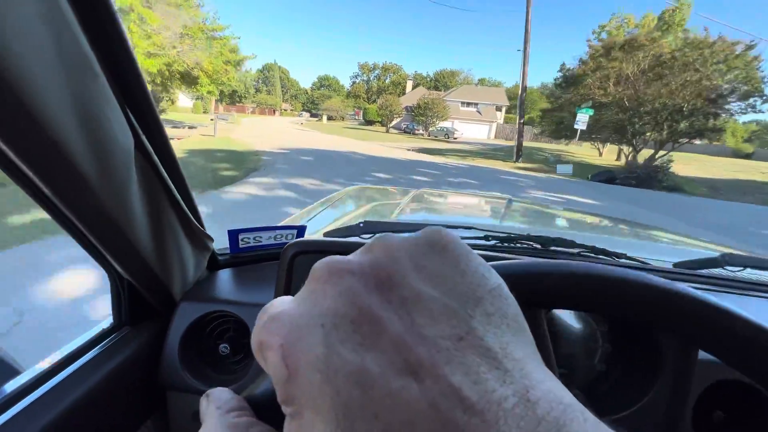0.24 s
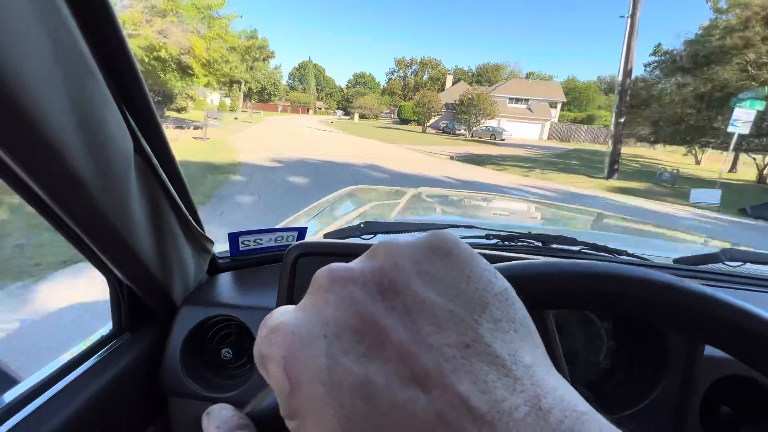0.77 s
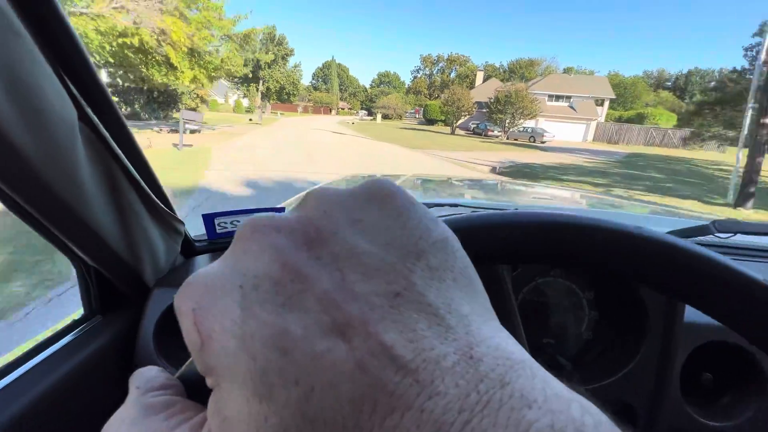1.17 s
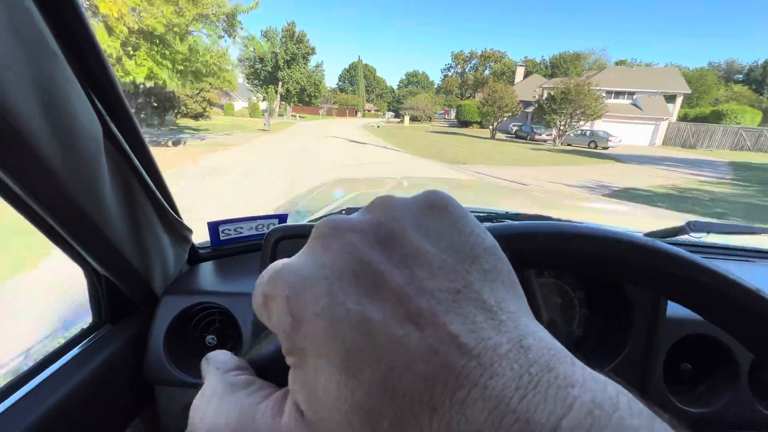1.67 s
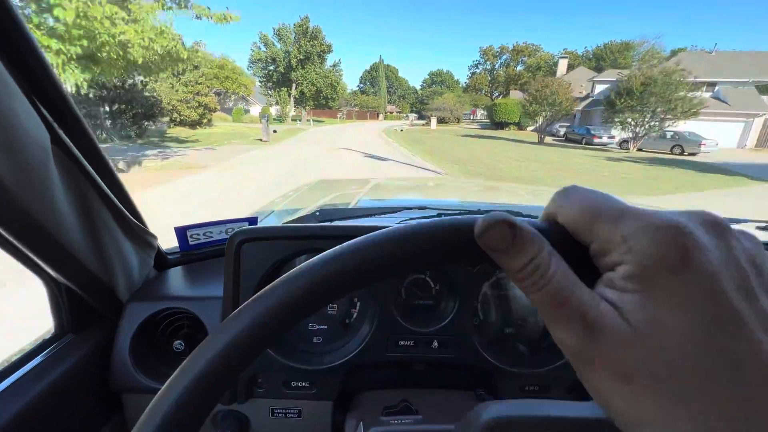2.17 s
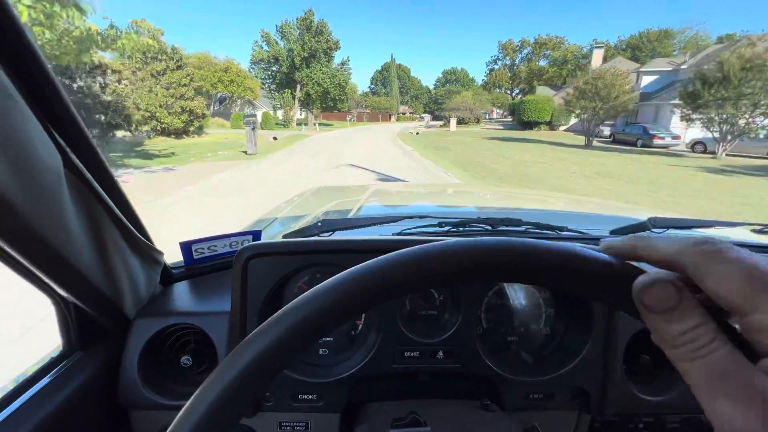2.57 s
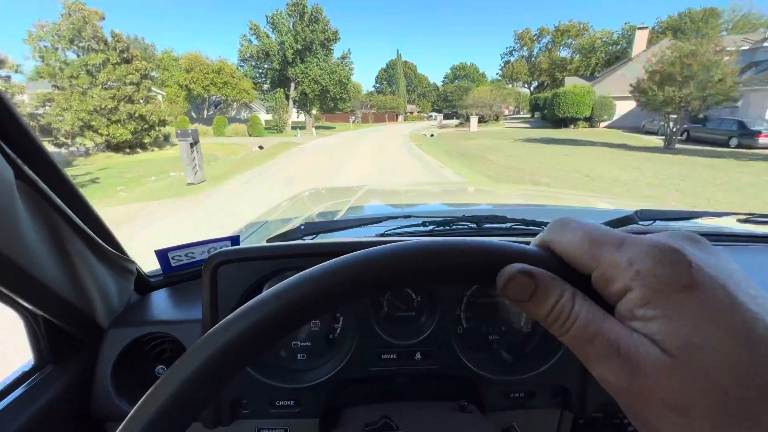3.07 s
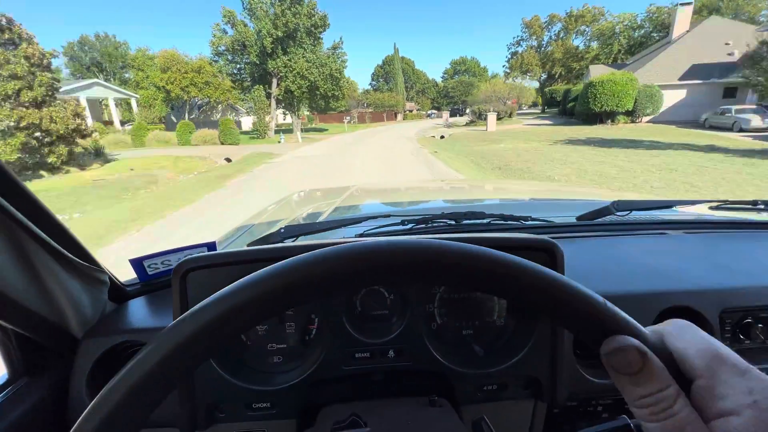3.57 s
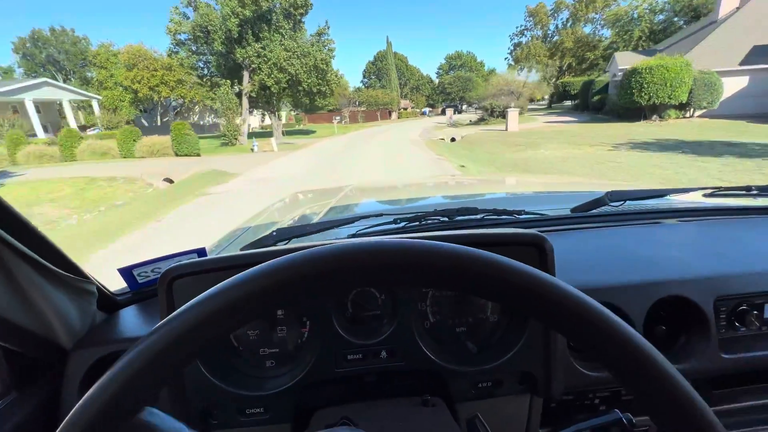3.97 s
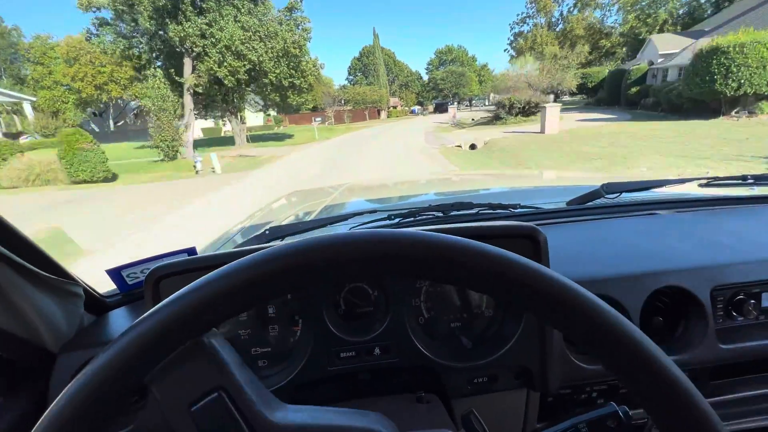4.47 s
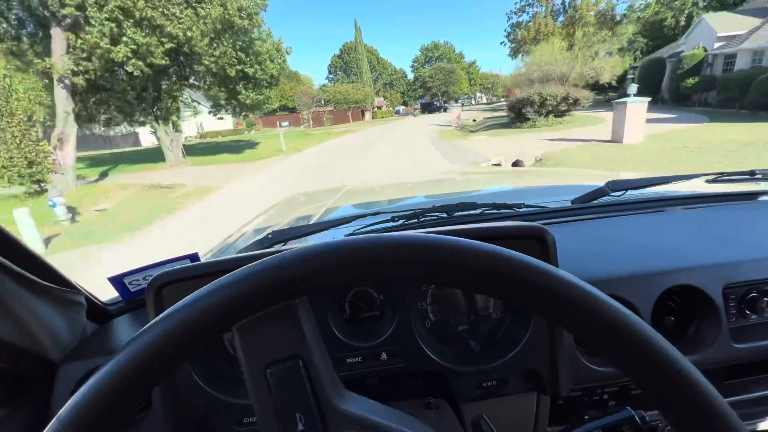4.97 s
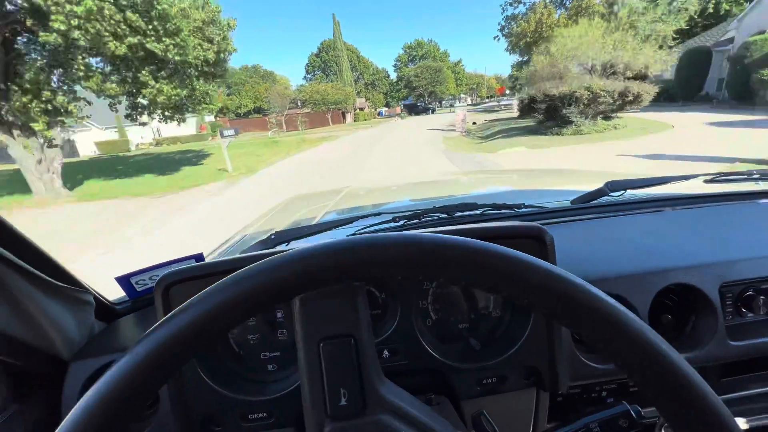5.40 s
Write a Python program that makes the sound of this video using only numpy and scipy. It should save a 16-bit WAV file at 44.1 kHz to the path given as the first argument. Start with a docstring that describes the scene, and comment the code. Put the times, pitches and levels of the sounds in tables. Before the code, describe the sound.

Heard at the driver's head with the left window open: a deep engine drone climbs, sags through a gear change, then climbs again and eases. Low body boom swells over bumps, tyre and air noise builds softly, and a thin gear whine glides. Sharp gritty cracks repeat about every third of a second, strongest midway. Faint hand brushes touch the wheel.

```python
"""Pulling away in an old four-wheel-drive

Heard at the driver's head with the left window open. The engine drones as firing-order sines, sags
through a gear change and climbs again; bumps swell a body boom of filtered noise; gears whine as gliding
sines; tyres and air are banded noise, louder left in the treble; something in a tyre tread cracks once a
wheel turn (noise bursts and taps); hands slide on the wheel in hissy brushes; an early ringing hiss fades.
"""
import sys
import numpy as np
from scipy import signal
from scipy.fft import rfft, irfft, next_fast_len
from scipy.io import wavfile
from scipy.ndimage import uniform_filter1d

SR = 44100
rng = np.random.default_rng(int(sys.argv[2]) if len(sys.argv) > 2 else 0)


def bounce(signal):
    """Save signal as a 16-bit WAV file at the path given by the first command-line argument."""
    frames = np.transpose(np.atleast_2d(signal))
    limited = np.clip(frames, -1, 1)
    pcm = np.round(limited * 32767).astype(np.int16)
    wavfile.write(sys.argv[1], SR, pcm)


N = 248724
TIME = np.arange(N) / SR
SIZE = next_fast_len(N)
FREQ = np.maximum(np.arange(SIZE // 2 + 1) * SR / SIZE, 1.)


def undb(db):
    """Decibels to gain."""
    return 10 ** (np.asarray(db) / 20)


def unit(x):
    """Scale to rms 1."""
    return x / np.sqrt(np.mean(x ** 2))


def curves(table):
    """Columns of a time table, one value a sample."""
    s, *columns = np.transpose(table)
    return [np.interp(TIME, s, c) for c in columns]


def over_freq(points):
    """(Hz, value) points joined on a log-frequency axis."""
    hz, value = np.transpose(points)
    return np.interp(np.log(FREQ), np.log(hz), value)


def resonances(modes):
    """Gain of steep resonances (each applied twice), summed in power."""
    power = 0
    for hz, width, db in modes:
        detune = (FREQ - hz ** 2 / FREQ) / width
        power = power + undb(2 * db) / (1 + detune ** 2) ** 2
    return np.sqrt(power)


def walk(rate):
    """Random levels held 1 / rate s and slewed twice; spread near 1."""
    k = int(SR / rate)
    steps = np.repeat(rng.standard_normal(N // k + 1), k)
    return 1.501 * uniform_filter1d(uniform_filter1d(steps, k), k)[:N]


def swells(table):
    """Power of bell-shaped swells from (time [s], length [s], level [dB]) rows."""
    return sum(undb(2 * db) * np.exp(-2 * (2 * (TIME - s) / length) ** 2) for s, length, db in table)


# how much louder the left is: (frequency [Hz], left over right [dB])
LEFT_LOUDER = [(100, .4), (250, 1.6), (600, 0.0), (1300, 4.0), (1800, 7.0), (2800, 8.0), (4400, 13.0),
               (7500, 13.0), (9500, .3), (15000, 0.0)]
# cabin noise shared by both microphones: (frequency [Hz], shared power [0-1])
LIKENESS = [(40, .999), (100, .985), (200, .95), (300, .45), (450, .15), (800, .25), (1200, .55),
            (2000, .35), (8000, .3), (15000, .4)]
EAR_LAG_S = 0.00043  # the head shadows one microphone: shared sound reaches the left later


def ears(likeness):
    """Spectra of noise at both microphones: a shared part, lagging left, and a part of their own."""
    shared, left, right = rfft(rng.standard_normal((3, SIZE)))
    share = np.clip(likeness, 0, 1)
    # only the middle and upper notes lag; no lag is applied above 9500 Hz
    lag_s = EAR_LAG_S / (1 + (400 / FREQ) ** 2) * (FREQ < 9500)
    late = np.exp(-2j * np.pi * FREQ * lag_s)
    common = np.sqrt(share) * shared * np.array([late, np.ones_like(late)])
    own = np.sqrt(1 - share) * np.array([left, right])
    return (common + own) * undb(over_freq(LEFT_LOUDER) * np.array([[.5], [-.5]]))


def stereo_noise(likeness, modes):
    """Resonant noise at both microphones, rms 1."""
    return unit(irfft(ears(likeness) * resonances(modes))[:, :N])


# engine speed, climbing, sagging through the gear change, climbing: (time [s], firing rate [Hz])
SPEED = [(0.0, 68.0), (0.4, 70.5), (0.8, 75.8), (1.4, 73.0), (1.6, 70.0), (1.8, 64.2), (1.98, 61.2),
         (2.8, 65.4), (3.4, 68.3), (4.0, 70.8), (4.5, 72.0), (5.64, 72.1)]
# throttle, also felt by the panels: (time [s], load [dB re full])
LOAD = [(0.0, -12), (.4, -6.5), (.65, -9.5), (1.0, -5.5), (1.35, -1), (1.65, 1), (2.7, 3), (3.1, 1),
        (4.3, -2), (4.7, -12), (5.0, -15), (5.64, -21)]
# how exhaust and cabin pass a firing order at full load: (frequency [Hz], level [dB])
ORDER_COLOUR = [(60, -13), (64, -16.5), (68, -20), (73, -17), (124, -31), (132, -35), (141, -28),
                (147, -22), (185, -39), (200, -36.5), (222, -34.5)]
LOAD_SHARES = (1.28, 0.83, 0.89)  # dB each whole order moves per dB of load
# weaker orders from uneven cylinders: (multiple of firing rate [x], level re second order [dB])
HALF_ORDERS = [(.5, -13.5), (1.5, -11), (2.5, -11.5), (4.0, -20)]
# the second order swells as the gear is changed: (time at the loudest [s], length [s], added power [dB])
SHUDDER = [(1.58, 0.22, 4)]


def engine():
    """Firing orders as clean lines on one slightly wavering shaft speed; load and cabin set their levels."""
    (hz,), (load_db,) = curves(SPEED), curves(LOAD)
    turn = 2 * np.pi * np.cumsum(hz * (1 + 0.0018 * walk(12))) / SR
    order_db = []
    for k, share in zip((1, 2, 3), LOAD_SHARES):
        order_db.append(np.interp(k * hz, *np.transpose(ORDER_COLOUR)) + share * load_db)
    uneven = [(k, order_db[1] + db + 2.2 * walk(8)) for k, db in HALF_ORDERS]
    # the second order comes and goes
    order_db[1] = order_db[1] + 1.5 * walk(6) + 10 * np.log10(1 + swells(SHUDDER))
    orders = list(zip((1, 2, 3), order_db)) + uneven

    apart = np.array([[0], [.002]])  # radians per Hz between the two microphones
    out = 0
    for k, db in orders:
        start = 2 * np.pi * rng.random()
        level = np.sqrt(2) * undb(db + 0.72 * walk(9.8))
        out = out + level * np.sin(k * turn + start + k * hz * apart)
    return out * undb(np.array([[.2], [-.2]]))  # a touch louder left


# impacts: (time [s], ring [dB], treble [dB], knock [dB], favoured ring [Hz], rise [s],
#           tick [dB], tick pitch [Hz], favoured knock [Hz]); layer levels before their colouring
CRACKS = [(0.306, -40, -46, -35, 1700, 0.0015, -44, 6100, 600),
          (0.774, -39.5, -45, -35, 1650, 0.0017, -48, 4250, 704),
          (1.380, -22, -28, -17, 1700, 0.0022, -33, 3950, 655),
          (1.4144, -28, -35.5, -27, 2410, 0.0038, -39, 5600, 730),
          (1.448, -37, -47, -42, 1960, 0.0027, -46, 3400, 700),
          (1.8206, -25, -31.5, -22, 1550, 0.0016, -26, 3940, 940),
          (2.1818, -22, -23, -18.5, 1600, .0025, -24, 4010, 910),
          (2.2022, -19, -26.5, -20, 2250, 0.0063, -34, 5460, 700),
          (2.563, -27, -37.5, -23.5, 1510, 0.0024, -26, 4000, 1100),
          (2.9492, -24.5, -31, -24, 1800, 0.0019, -31, 3560, 1150),
          (3.333, -28, -31, -25, 1640, 0.002, -31, 3500, 1150),
          (3.696, -23, -26, -23, 1850, 0.0023, -32, 5590, 900),
          (4.0603, -34, -38, -25, 2020, 0.0027, -38, 4140, 606),
          (4.405, -33.5, -48, -25.5, 1797, .003, -47, 3600, 1140),
          (4.7306, -31.5, -34, -26, 2360, 0.0037, -33, 5300, 640),
          (5.0544, -38.5, -42, -46, 2340, 0.0024, -45, 4900, 700),
          (5.419, -36, -49, -49, 2200, 0.0035, -42, 3180, 700),
          (5.437, -39, -45, -47, 2300, 0.0057, -44, 4340, 700)]
# the ring of the cracks: (frequency [Hz], width [Hz], level [dB])
CRACK_MODES = [(490, 240, 2), (666, 250, 0), (910, 79, -1.5), (1142, 77, 6.5), (1540, 540, -1),
               (1950, 1400, 0.5), (2380, 280, 0.5), (2680, 220, 4), (3970, 1100, 1), (4700, 3500, 3.5),
               (5700, 240, 7), (6610, 600, 2), (7630, 2800, 1.5), (12000, 2400, -18)]
CRACK_T60_S = 0.076  # of the ring; treble falls 1.3 times as fast, knock 0.6 times


def cracks():
    """Sprays of tiny impacts: treble snaps first and dies soonest, ring and knock swell after it."""
    noise = ears(0.17) * resonances(CRACK_MODES)
    knock_gain, treble_gain = 1 / (1 + (FREQ / 1300) ** 8), 1 / (1 + (3200 / FREQ) ** 6)
    gains = (knock_gain, 1 - knock_gain - treble_gain, treble_gain)
    low, ring, high = (unit(irfft(noise * g)[:, :N]) for g in gains)
    out, taps = np.zeros((2, 2, N))
    for s, ring_db, treble_db, knock_db, hz, rise_s, tick_db, tick_hz, knock_hz in CRACKS:
        a = int(s * SR)
        age = TIME[:min(int(.16 * SR), N - a)]
        span = slice(a, a + len(age))
        # slower blows last longer
        fall = np.log(1000) * np.maximum(age - 0.61 * rise_s, 0) / CRACK_T60_S
        tail = 0.045 * np.exp(-fall / 3)  # the cabin holds a little of it
        snap, swell = (1 - np.exp(-(age / max(r, 1e-4)) ** 2) for r in (0.22 * rise_s, rise_s))
        mid, top = undb(ring_db) * ring[:, span], undb(treble_db) * high[:, span]
        # each blow lands differently and favours one ring and one knock
        favoured = 1.6 * signal.lfilter(*signal.iirpeak(hz, 4.5, fs=SR), mid + top)
        thud = 0.55 * low[:, span]
        thud = thud + 1.14 * signal.lfilter(*signal.iirpeak(knock_hz, 4.5, fs=SR), low[:, span])
        ringing = (mid + favoured) * (np.exp(-fall) + tail)
        knocking = undb(knock_db) * thud * np.exp(-.6 * fall)
        out[:, span] += swell * (ringing + knocking) + snap * top * (np.exp(-1.3 * fall) + tail)
        taps[:, span] += tick(age, tick_db, tick_hz)
    grain = undb(1.5 * walk(900))
    return taps + out * grain / 2  # the noise layers are played at half level under the taps


TICK_T60_S, TICK_RISE_S = .014, .0012
# upper ring of each tap: (frequency [Hz], level re main ring [dB])
TICK_UPPER = (6500, -9)


def tick(age, db, hz):
    """One hard tap, leaning left: two short decaying rings."""
    left_hz, left_gain_db = np.transpose(LEFT_LOUDER)
    out = 0
    for ring_hz, ring_db in ((hz, db), (TICK_UPPER[0], db + TICK_UPPER[1])):
        left_db = np.interp(np.log(ring_hz), np.log(left_hz), left_gain_db)
        level = undb(ring_db + left_db * np.array([[.5], [-.5]]))
        out = out + level * np.sin(2 * np.pi * (ring_hz * age + rng.random((2, 1))))
    rise = 1 - np.exp(-(age / TICK_RISE_S) ** 2)
    return out * rise * np.exp(-np.log(1000) * age / TICK_T60_S)


# low shell modes: (frequency [Hz], width [Hz], level [dB])
BOOM_MODES = [(52.12, 2.5, -0.5), (58.7, 17.5, -10.5)]
# panel modes: (frequency [Hz], width [Hz], level [dB])
PANEL_MODES = [(22, 16, -6.5), (35, 4.8, -5), (80, 18, -2.5), (96, 21, 2), (131, 65, -3), (168, 31, -1),
               (200, 37, -2.5), (303, 55, -15.5)]
# bumps that swell the boom: (time at the loudest [s], length [s], boom drive [dB])
BUMPS = [(.2, 0.13, -17.5), (.42, 0.18, -24), (.84, 0.13, -14), (1.87, 0.19, -18.5), (2.2, 0.21, -19.5),
         (3.5, 0.27, -15), (3.9, 0.85, -16), (4.15, 0.14, -32), (4.62, 0.39, -15.5), (5.17, 0.056, -22),
         (5.39, 0.17, -13), (5.64, 0.23, -19.5)]
BOOM_DB, PANEL_DB, PANEL_LOAD_SHARE = -23, -24.5, 0.17  # dB, dB, panel dB per dB of load


def body():
    """Road bumps swell the low boom; the panels rumble on with the throttle."""
    # the steady boom drops by 1.5 dB after 4.4 s
    steady = undb(2 * (BOOM_DB + np.where(TIME > 4.4, -1.5, 0)))
    boom = stereo_noise(over_freq(LIKENESS), BOOM_MODES)
    # the ring rides over its own dips, so the boom is steadier than plain noise
    boom = boom / np.sqrt(.08 + uniform_filter1d(boom[0] ** 2, int(.06 * SR)))
    panels = stereo_noise(over_freq(LIKENESS), PANEL_MODES)
    panel_db = PANEL_DB + PANEL_LOAD_SHARE * curves(LOAD)[0]
    return boom * np.sqrt(steady + swells(BUMPS)) + panels * undb(panel_db)


# gear whine spells: (start [s], loudest [s], end [s], start pitch [Hz], climb [Hz/s],
#                     steepening [Hz/s^2], loudest level [dB], fall [dB/s])
WHINE = [(0.854, 1.2, 1.3, 930, -25, -1.5, -45.5, 13), (1.296, 1.48, 1.88, 456, 59, 2, -38.5, 8),
         (2.55, 3.35, 4.7, 461.3, -3, 10.5, -38, 12.5)]
WHINE_RISE_DB, WHINE_OCTAVE_DB = 12, -14  # rise to the loudest; octave re fundamental


def whine():
    """Gear teeth sing a thin gliding line with a faint octave."""
    out = 0
    for start, top, end, hz, climb, steepen, top_db, fall_db in WHINE:
        rise = WHINE_RISE_DB * (top - TIME) / (top - start)
        db = top_db - np.where(TIME < top, rise, fall_db * (TIME - top))
        fade = np.clip(np.minimum(TIME - start, end - TIME) / 0.024, 0, 1)
        waver, patchy_db = 1 + .003 * walk(12), 1.7 * walk(12)  # the teeth load and unload
        pitch = (hz + climb * (TIME - start) + steepen * (TIME - start) ** 2) * waver
        turn = 2 * np.pi * np.cumsum(pitch) / SR
        line = np.sin(turn + np.array([[0], [1.4]])) + undb(WHINE_OCTAVE_DB) * np.sin(2 * turn)
        out = out + fade * np.sqrt(2) * undb(db + patchy_db) * line
    return out


# road speed gained: (time [s], share [0-1])
PACE = [(0.0, 0), (.7, 0.4), (1.2, 0.77), (1.8, 0.74), (3.2, 0.97), (4.2, 1), (4.8, 0.78), (5.64, 0.73)]
# tyre drone, tyre roar, air rush, hiss: (level [dB], gain with speed [dB])
# the roar's mean sets the whole layer; the other rows only shape their bands over time
ROAD_BANDS = [(-47, 3.5), (-47.5, 7), (-46, 3.5), (-55, 1)]
# tone of the road noise: (frequency [Hz], relative density [dB per Hz])
ROAD_COLOUR = [(150, -25.5), (240, -1.5), (420, -5.5), (800, -11.5), (1050, -7), (1300, -11.5),
               (1700, -15.5), (2000, -19), (2600, -26), (3000, -28.5), (4200, -32), (6000, -35),
               (7600, -39), (8300, -35), (10300, -48), (11500, -41.5), (13000, -56), (15500, -58.5)]
# cabin resonances: (frequency [Hz], width [Hz], level over the roar [dB])
CABIN_MODES = [(462, 32, 4), (671, 184, 4.5), (934, 22, 4.5), (1593, 220, 1), (2304, 6.9, 8.5),
               (2550, 25, 5.5), (4400, 86, -13), (5600, 120, -1), (4900, 88, -5.5), (7320, 290, 5)]
SWELL_DB = .45
LUMP_DB, LUMPS_PER_S = 1.0, 20  # rough surface: lumps that deepen with speed


def road():
    """Half-octave bands of tyre and air noise swell together, share lumps in the roar, and each flicker."""
    pace = curves(PACE)[0]
    levels_db = [db + gain_db * pace for db, gain_db in ROAD_BANDS]
    roar_db = levels_db[1]
    colour = undb(over_freq(ROAD_COLOUR)) * np.hypot(1, resonances(CABIN_MODES))
    noise = ears(over_freq(LIKENESS)) * colour
    swell_db = SWELL_DB * walk(1.78)
    lumps_db = LUMP_DB * pace * walk(LUMPS_PER_S)
    # the roar band, averaged over both sides, is the level reference
    scale = np.std(irfft(noise * (FREQ > 550) * (FREQ < 1250)).mean(axis=0))
    out = 0
    for hz in 160 * 2 ** np.arange(0, 7, .5):
        crossfade = np.cos(np.pi / 2 * np.clip(2 * np.log2(FREQ / hz), -1, 1)) ** 2
        band = irfft(noise * crossfade)[:, :N]
        db = levels_db[np.searchsorted((550, 1200, 3000), hz)]
        if hz < 1300:  # the roar is lumpier than the hiss
            flicker_db = 1.18 * walk(12) + (hz > 400) * lumps_db
        else:
            flicker_db = 0.58 * walk(13)
        out = out + band * undb(db - db.mean() + swell_db + flicker_db)
    return out * undb(roar_db.mean()) / scale


# hands sliding on the wheel rim: (time at the loudest [s], length [s], level [dB])
SLIDES = [(.33, 0.087, -57.5), (1.63, .1, -53), (2.03, .16, -60), (2.44, 0.056, -50.5), (2.5, 0.17, -58),
          (2.675, 0.086, -50), (2.76, 0.27, -56.5), (4.33, 0.055, -59), (4.77, 0.085, -53.5),
          (4.84, 0.043, -60)]
# skin hiss: (frequency [Hz], width [Hz], level [dB])
SLIDE_MODES = [(5300, 4100, 3), (7340, 1600, 3), (11900, 1000, 3), (14800, 1500, -11)]


def slides():
    """Skin brushing the rim: short swells of grainy hiss."""
    hiss = stereo_noise(0.28 + .5 * (FREQ > 9500), SLIDE_MODES)
    return hiss * np.sqrt(swells(SLIDES)) * undb(1.8 * walk(160))


# ringing hiss: (frequency [Hz], width [Hz], level [dB])
EARLY_RING = [(1660, 74, 0), (1786, 60, 0)]
EARLY_DB, EARLY_FADE_S = -47, 0.45


def early_ring():
    """Noise through two narrow resonances, fading as the car pulls away."""
    ring = stereo_noise(over_freq(LIKENESS), EARLY_RING)
    return ring * undb(EARLY_DB) * np.exp(-(TIME / EARLY_FADE_S) ** 2)


def scene():
    """All sources at both microphones."""
    return engine() + cracks() + body() + whine() + road() + slides() + early_ring()


def record(dry):
    """A steep elliptic low-pass cuts the top above 15750 Hz."""
    return signal.sosfilt(signal.ellip(10, .2, 70, 15750, fs=SR, output="sos"), dry)


dry = scene()
out = record(dry)
bounce(out)
```